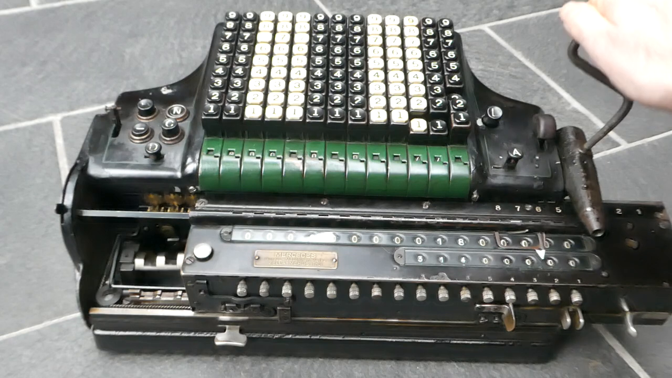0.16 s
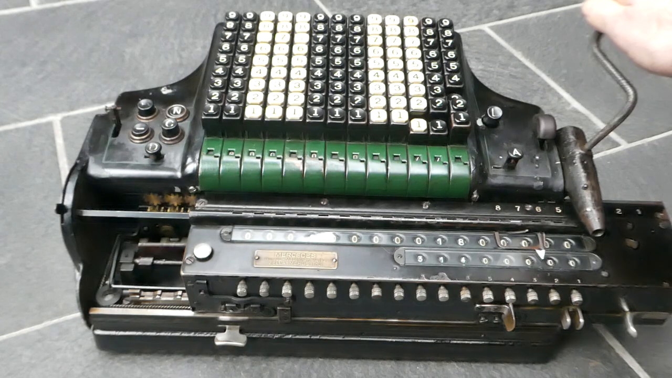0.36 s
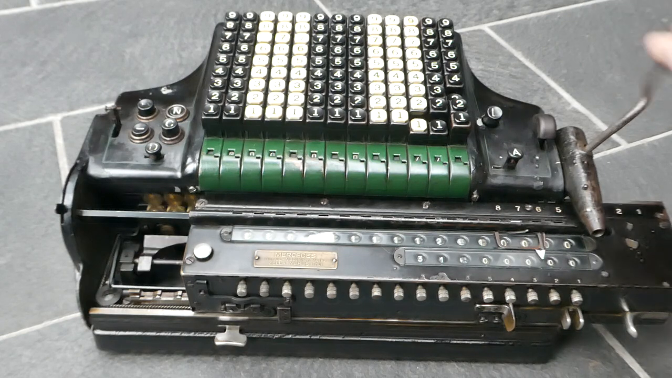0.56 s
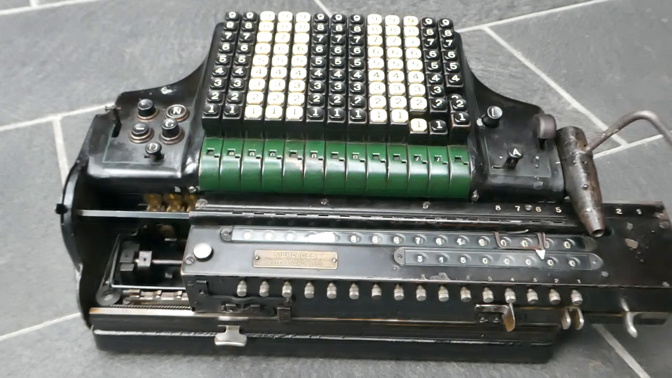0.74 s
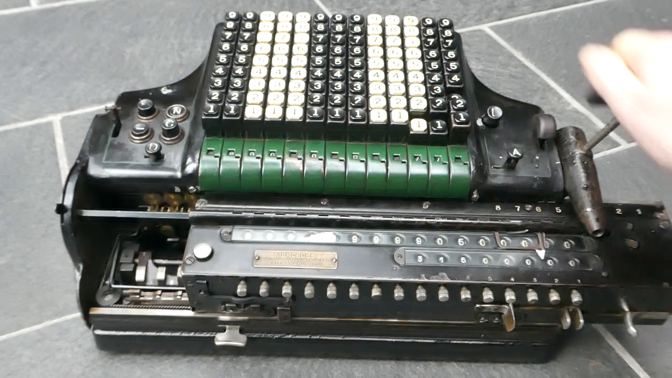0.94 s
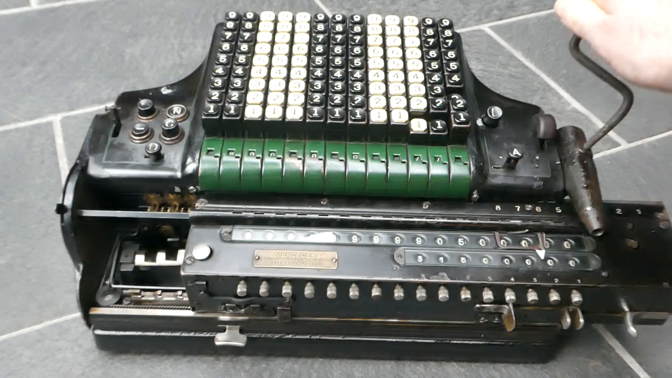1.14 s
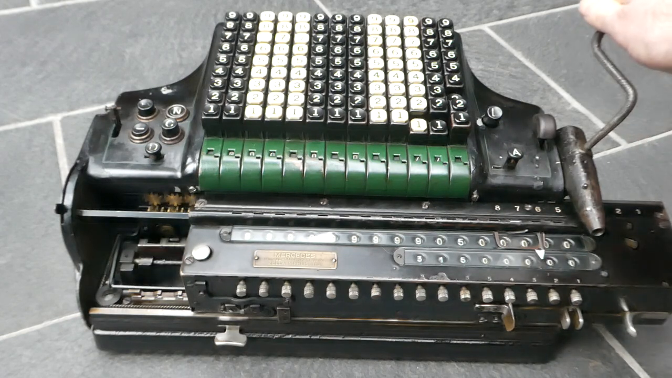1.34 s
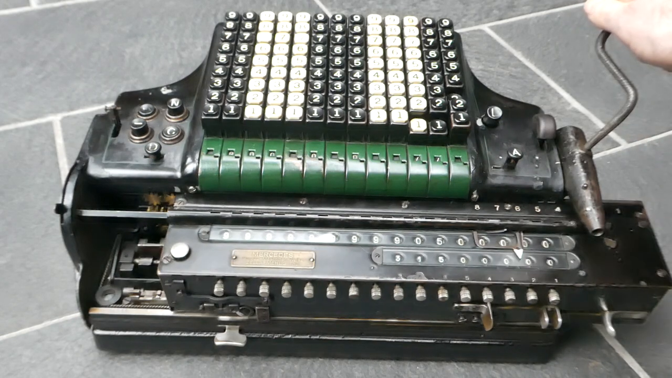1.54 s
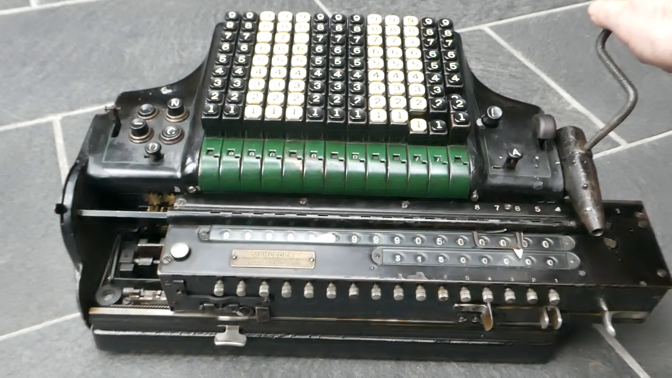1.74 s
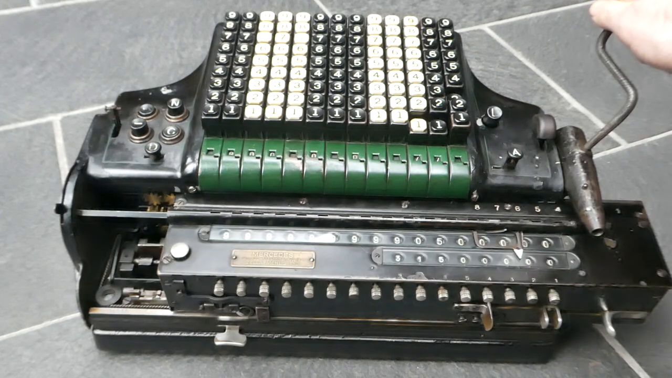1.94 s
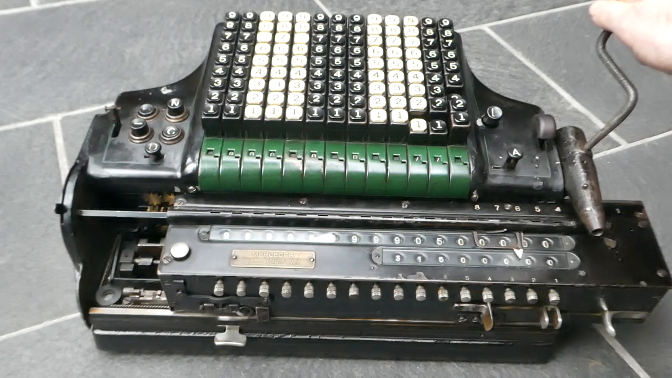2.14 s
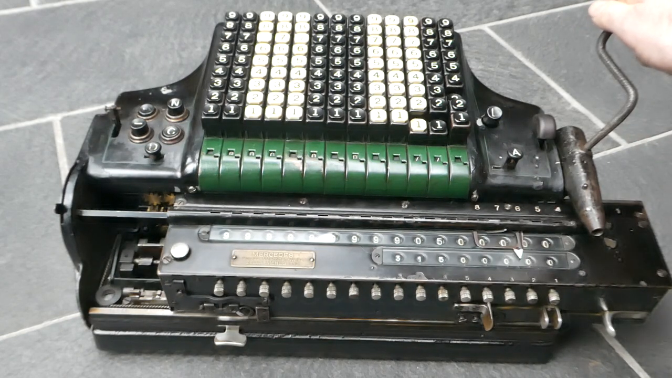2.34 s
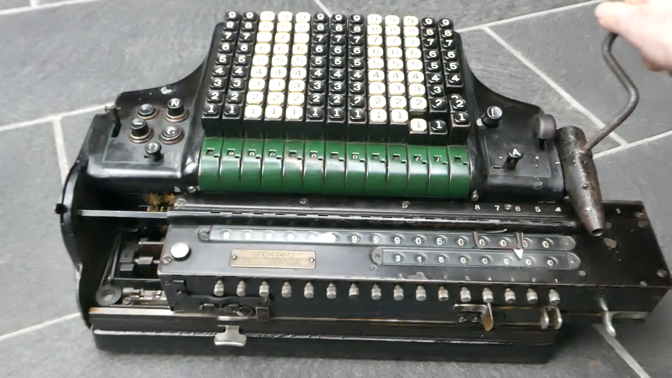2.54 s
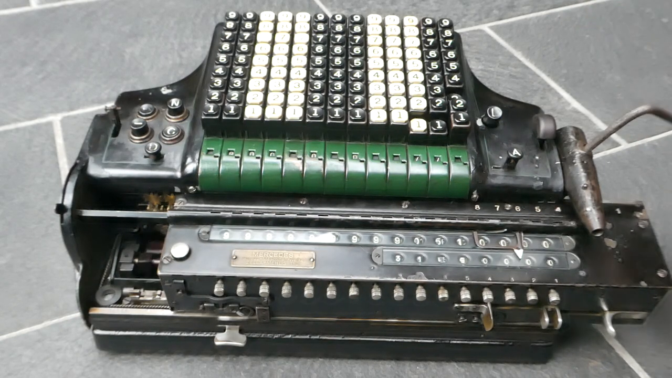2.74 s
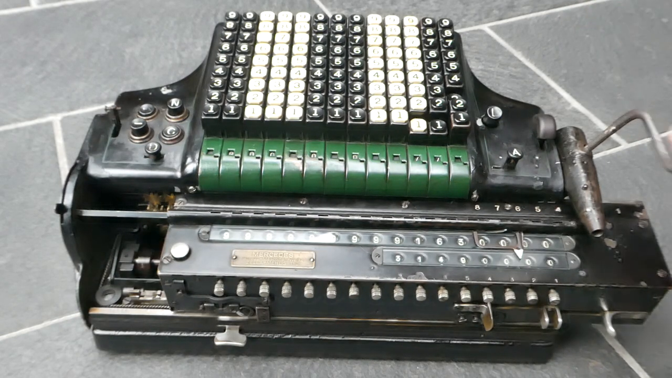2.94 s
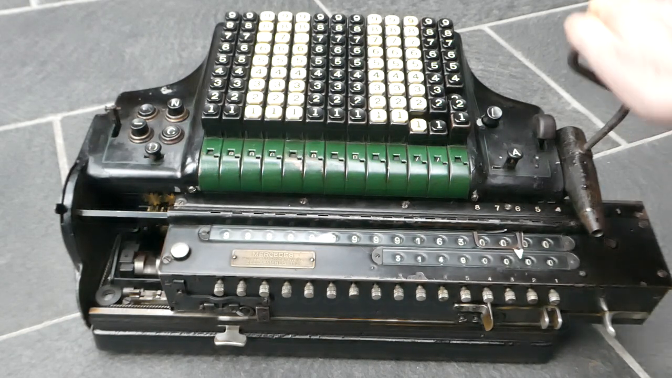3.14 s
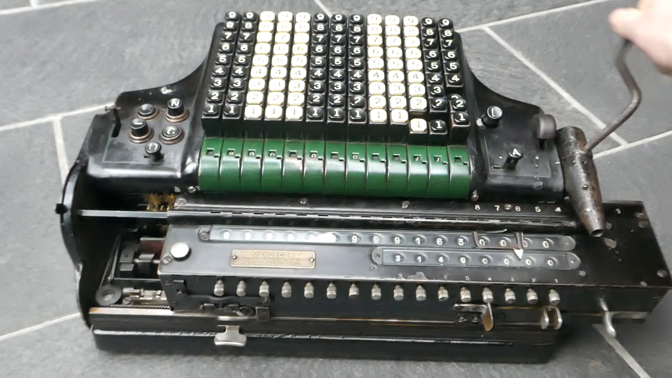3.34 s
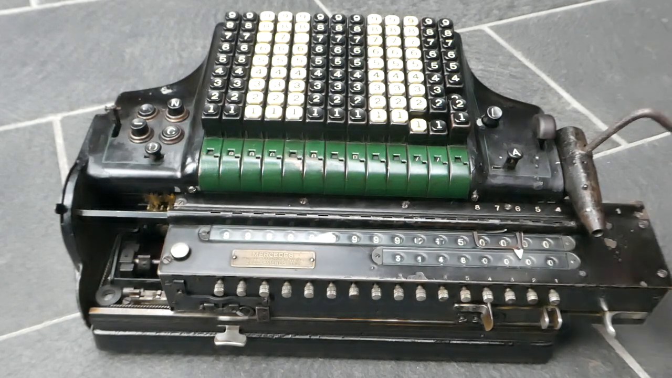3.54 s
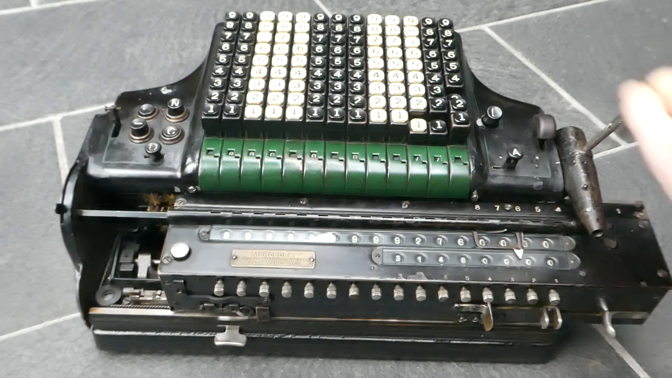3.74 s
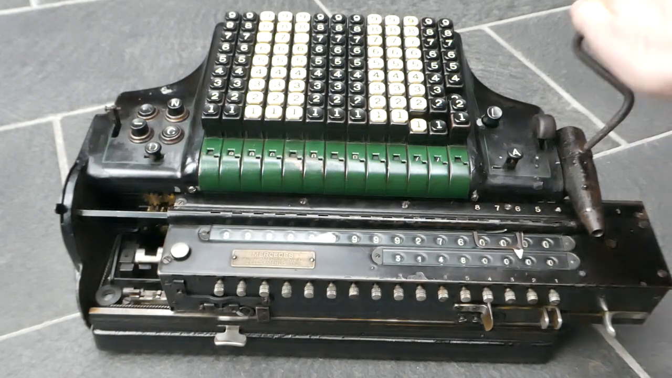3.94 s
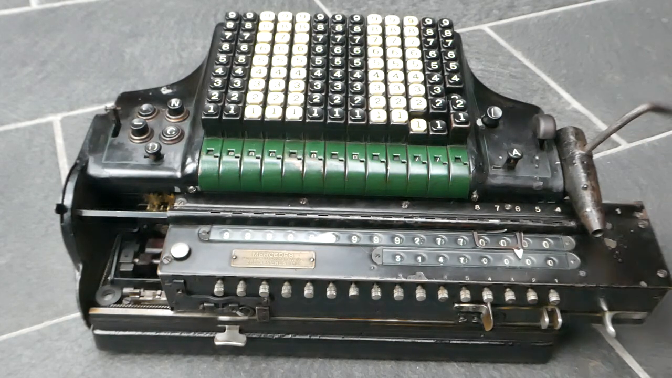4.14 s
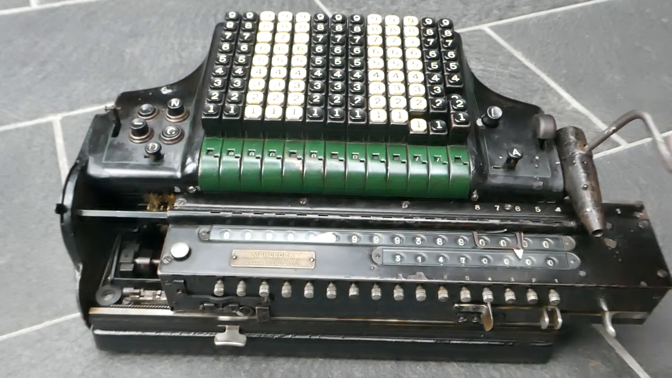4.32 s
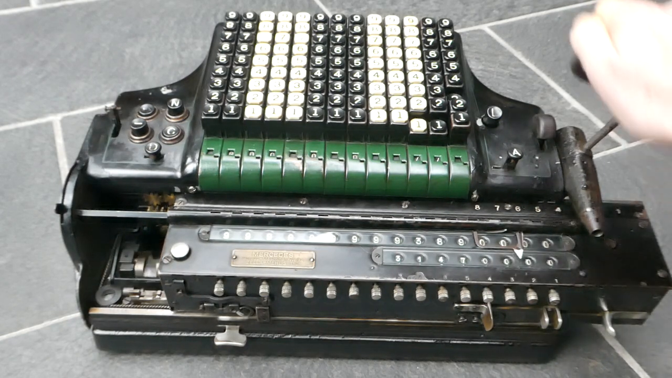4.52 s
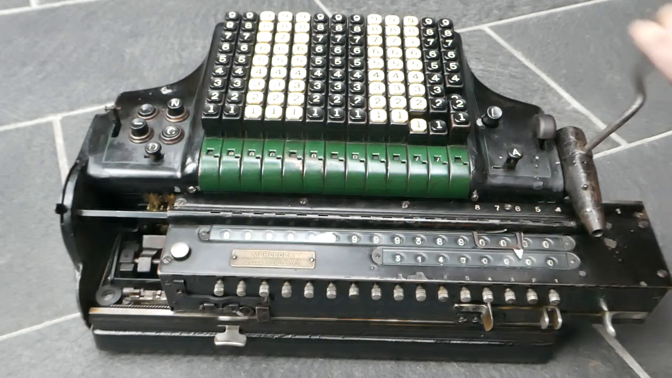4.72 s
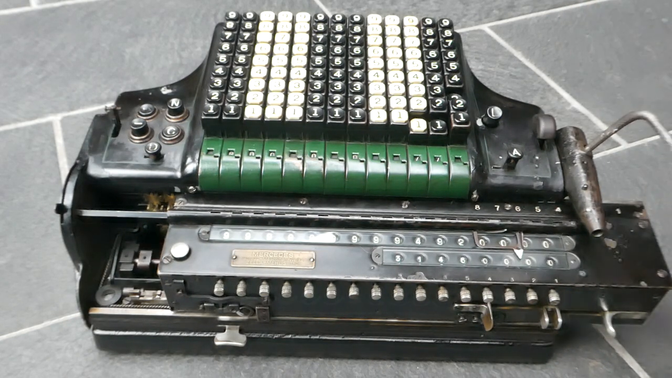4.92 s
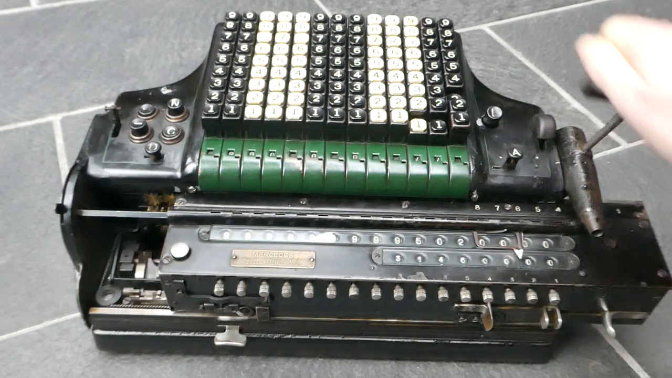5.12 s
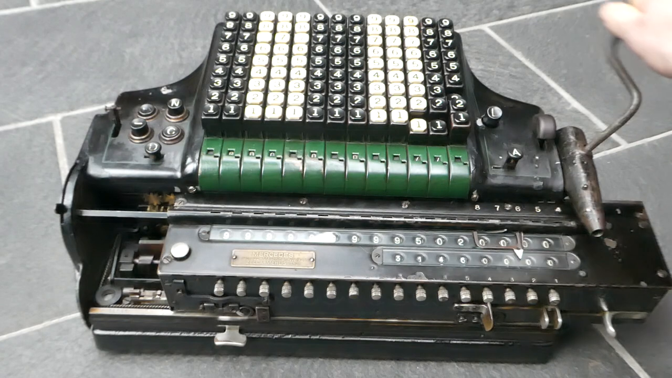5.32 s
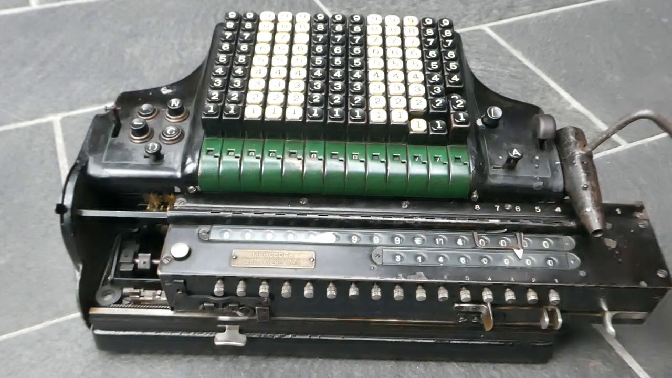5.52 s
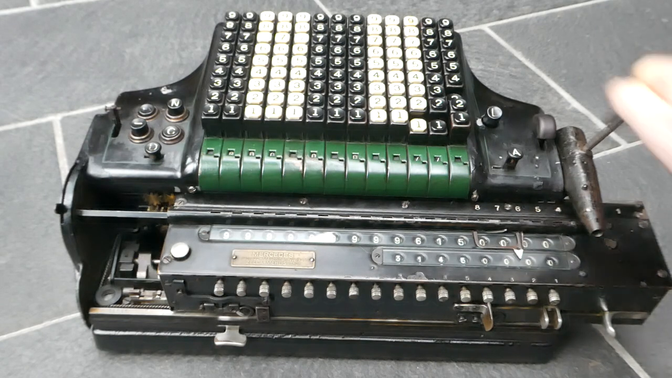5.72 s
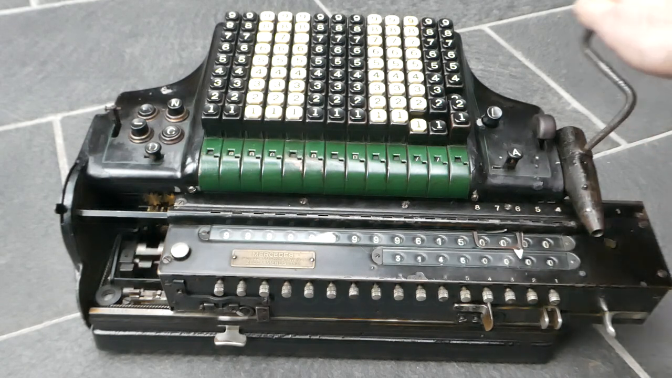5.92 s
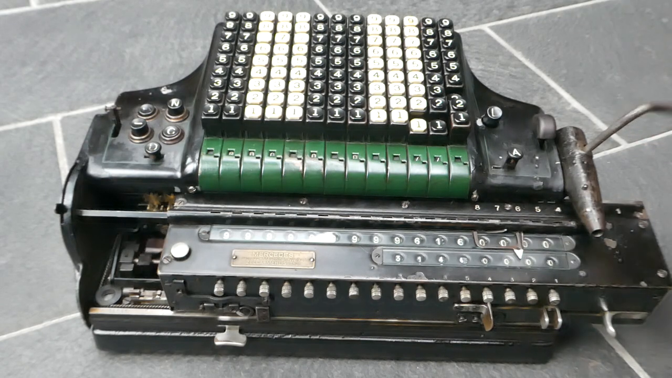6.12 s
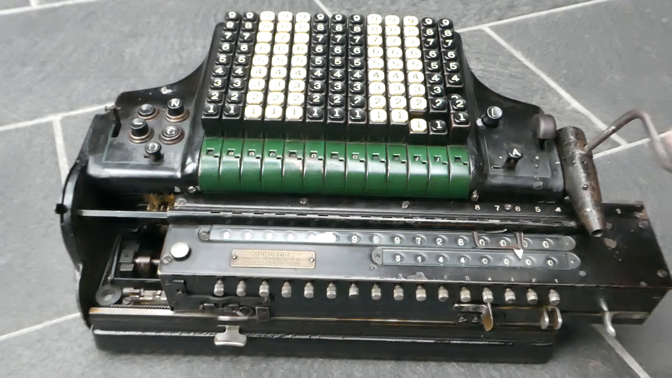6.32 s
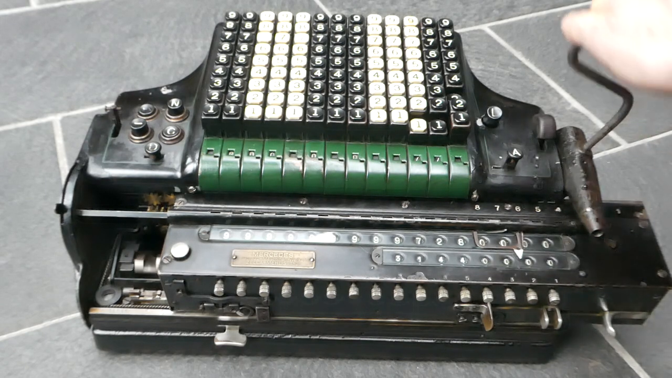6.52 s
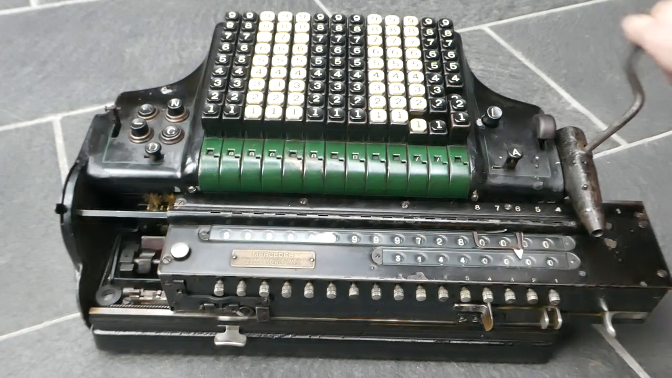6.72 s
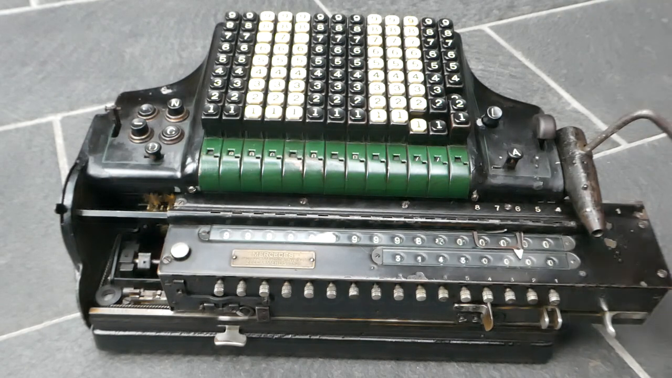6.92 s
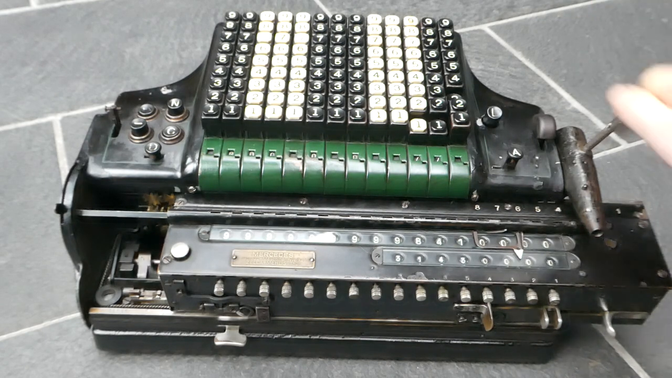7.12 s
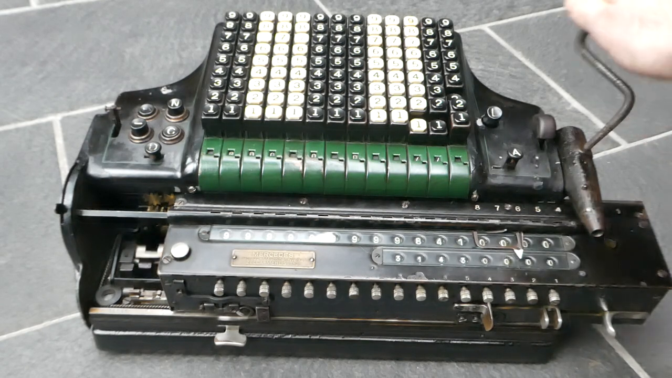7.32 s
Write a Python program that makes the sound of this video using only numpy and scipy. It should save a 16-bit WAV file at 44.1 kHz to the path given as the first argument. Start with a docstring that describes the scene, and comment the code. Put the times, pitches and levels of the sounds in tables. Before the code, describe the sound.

Close metallic ticking and knocking from a mechanical calculator, a short pause, then seven regular crank turns, each a ratchet whirr and a clank.

```python
"""A hand-cranked mechanical calculator on the tiled floor of a small hard room, miked close in stereo.
First, carries ripple through the number wheels, the carriage clanks, the wheels rasp and levers knock.
The crank rests for about a second; then the latch clinks, and from 3 s on come seven steady turns.
Each whirrs the ratchet and throws the carriage against its stop; between turns pawls click home.
The steel casing rings with the works, and the walls answer over a faint room tone."""
import sys
import numpy as np
from scipy import signal
from scipy.fft import rfft, irfft, next_fast_len
from scipy.io import wavfile
from scipy.ndimage import uniform_filter1d, map_coordinates

SR = 44100
rng = np.random.default_rng(int(sys.argv[2]) if len(sys.argv) > 2 else 0)


def waveform_to_disk(signal):
    """Save audio, clipped to [-1, 1], as 16-bit WAV at the path in sys.argv[1]."""
    frames = np.transpose(np.atleast_2d(signal))
    scaled = np.clip(frames, -1, 1) * 32767
    samples = np.round(scaled).astype(np.int16)
    wavfile.write(sys.argv[1], SR, samples)


N = 328986
FFT_SIZE = next_fast_len(N + SR)
HZ = np.fft.rfftfreq(FFT_SIZE, 1 / SR)
TIME = np.arange(N) / SR
AGE = np.arange(SR // 8) / SR  # seconds since a blow

# The carriage hits its stop. Each row: time in seconds, level in dB, extra thud in dB.
THROWS = [(0.411, -11.5, -1.5), (3.3168, -10, 0.5), (4.0469, -10, -0.5), (4.6946, -9, -1.5),
          (5.3438, -9, -1.5), (5.9994, -9.5, -2.5), (6.677, -9.5, -1), (7.4109, -10, -1)]
HARDEST_DB = max(db for _, db, _ in THROWS)
# The loose linkage clacks after a throw. Each row: time in seconds, level in dB.
LINKAGE_CLACKS = [(3.407, -35), (3.425, -32), (3.44, -31), (3.478, -18), (3.492, -23.5), (4.11, -18),
                  (4.148, -19), (4.162, -21), (4.757, -18), (4.794, -18.5), (4.809, -16.5), (5.414, -21.5),
                  (5.457, -18), (5.473, -20), (6.082, -18), (6.127, -21), (6.145, -25), (6.177, -25),
                  (6.777, -21.5), (6.828, -19), (6.84, -16.5), (6.877, -23.5)]
# One ratchet run a turn. Each row: first tooth, trip lever, last tooth in seconds, first and last dB.
RATCHET_RUNS = [(3.021, 3.137, 3.27, -36, -37.5), (3.743, 3.871, 3.98, -37.5, -36),
                (4.403, 4.53, 4.66, -38, -34.5), (5.053, 5.176, 5.325, -34.5, -36.5),
                (5.709, 5.831, 5.98, -37.5, -35.5), (6.393, 6.515, 6.73, -37, -34.5),
                (7.124, 7.247, 7.36, -37, -35)]
# Many number wheels turn at once. Each row: start and end in seconds, first and last level in dB.
WHEEL_RASPS = [(0.609, 0.805, -30, -37), (0.805, 0.895, -43.5, -41), (0.896, 1.02, -32.5, -50)]
# The colours of small steel parts and of a sharp tick. Each row: frequency in Hz, relative level in dB.
STEEL_SPECTRUM = [(35, -72), (90, -13), (300, -10), (750, -3.5), (1200, -6), (2000, -2), (3200, 2.5),
                  (4500, -1), (6500, -0.5), (7900, -4), (9500, 1), (11300, -2.5), (13500, -12),
                  (16000, -21)]
TICK_SPECTRUM = [(35, -54), (80, -15), (300, -5.5), (1200, -5.5), (2000, -3), (3200, 0.5), (7500, -3),
                 (11000, -0.5), (13000, -11.5), (16000, -22.5)]


def amp(db):
    """Decibels to gain."""
    return 10 ** (np.asarray(db) / 20)


def unit(x):
    """x at rms 1."""
    return x / np.sqrt(np.mean(x ** 2) + 1e-20)


def along(points, hz):
    """(Hz, value) points read on a log frequency axis."""
    freqs, values = np.transpose(points)
    return np.interp(np.log(hz + 1), np.log(freqs + 1), values)


def level(rows, t):
    """Gain of a (seconds, dB) curve, silent outside its span."""
    s, db = np.transpose(rows)
    return amp(np.interp(t, s, db)) * (t >= s[0]) * (t <= s[-1])


def filtered(x, response):
    """x through a frequency response."""
    return irfft(rfft(x, FFT_SIZE) * response, FFT_SIZE)[..., :N]


def coloured(x, spectrum):
    """Minimum-phase filter shaped by (Hz, dB) points; white noise keeps its level."""
    gain = unit(amp(along(spectrum, HZ)))
    cepstrum = irfft(np.log(gain + 1e-6), FFT_SIZE)
    cepstrum[1:FFT_SIZE // 2] *= 2
    cepstrum[FFT_SIZE // 2 + 1:] = 0
    return filtered(x, np.exp(rfft(cepstrum)))


def add(track, s, sound):
    """Mix a sound into the track at s seconds."""
    part = track[..., max(round(s * SR), 0):][..., :sound.shape[-1]]
    part += sound[..., :part.shape[-1]]


def burst(rise, t60):
    """A crowd of short-lived modes: mid and side noise that swells and dies."""
    shape = (1 - np.exp(-AGE / rise)) * amp(-60 * AGE / t60)
    return shape / shape.max() * rng.standard_normal((2, len(AGE)))


def chatter(spread, t60, count):
    """A light part touches several times within milliseconds; a nearby plate adds one quick echo."""
    out = np.zeros((2, len(AGE)))
    for touch in (np.arange(count) + rng.uniform(0, 1, count)) / count:
        add(out, touch * spread, rng.uniform(0.73, 1) * burst(rise=0.000092, t60=t60))
    add(out, rng.uniform(.0001, .0006), rng.choice([-.4, .4]) * out)
    return out / np.sqrt(count)


def ring(modes, detune, rise):
    """A few clear decaying modes, tuned a little differently at every blow."""
    tone = sum(amp(db - 60 * AGE / t60) * np.sin(2 * np.pi * hz * rng.normal(1, detune) * AGE)
               for hz, db, t60 in modes)
    return tone * (1 - np.exp(-(AGE / rise) ** 2))


def heavy_contacts():
    """The blows of carriage, linkage and levers, as (seconds, level dB, thud dB, treble dB)."""
    # A graze, the blow, two rebounds. Each row: delay in seconds; level, thud, treble in dB re the throw.
    impact = [(-.012, -17, -33.5, -48), (0, 0, -13.5, -29), (.025, -5.5, -20, -31.5),
              (.034, -13.5, -18, -34.5)]
    # Levers shift and fall home. Each row: time in seconds; level, thud and treble in dB.
    levers = [(1.1003, -23, -41, -29.5), (1.273, -25, -25.5, -38), (1.372, -13.5, -30.5, -43),
              (1.383, -21, -28.5, -39.5), (1.422, -48, -32, -54), (1.5507, -23, -18.5, -24.5),
              (1.588, -33, -25.5, -46), (1.612, -42, -36, -57), (1.651, -44, -32.5, -52),
              (1.675, -37, -45, -55), (2.58, -32, -40, -53.5), (2.591, -39, -49, -66),
              (2.6697, -20.5, -39, -50), (2.678, -23.5, -39, -58), (2.7084, -26, -32.5, -39.5),
              (2.715, -24, -37, -50), (2.8755, -20, -36.5, -45), (6.714, -31, -30.5, -45),
              (6.744, -36, -28.5, -54), (6.864, -21.5, -44, -34)]
    carriage = [(s + delay, db + hit_db, db + weight_db + thud_db, db + treble_db)
                for s, db, weight_db in THROWS for delay, hit_db, thud_db, treble_db in impact]
    linkage = [(s, db, db - 16.5, db - 30) for s, db in LINKAGE_CLACKS]
    return carriage + linkage + levers


def knocks():
    """Contacts crack and the base thuds; hard blows clank heavy parts, soft ones rattle the linkage."""
    # The colours of a blow. Each row: frequency in Hz, relative level in dB.
    snap_spectrum = [(60, -60), (300, -29), (2500, -6), (4700, 14), (7500, 11), (9800, 15), (12500, 5),
                     (16000, 0)]  # the bright first edge
    clank_spectrum = [(500, -30), (1150, -9), (1650, 0), (2200, -5), (3100, 0), (4000, -6.5), (5400, -9),
                      (7500, -20), (14000, -59)]  # heavy parts
    clack_spectrum = [(60, -49), (500, -13), (1100, -12), (1550, 2), (2000, -0.5), (2700, -3), (4200, -9),
                      (7000, -14), (14000, -84)]  # loose linkage
    thud_spectrum = [(30, -85), (70, -11.5), (125, -7), (220, -6.5), (320, 1), (600, 1.5), (850, 1),
                     (1100, -5.5), (2000, -22.5), (6000, -54)]  # the base
    snap, crack, clank, clack, thud = np.zeros((5, 2, N))
    for s, db, thud_db, treble_db in heavy_contacts():
        hardness = amp(db - HARDEST_DB)
        add(snap, s, amp(treble_db + 13 * hardness) * burst(rise=.0001, t60=0.005))
        add(crack, s, amp(treble_db + 5.5) * burst(rise=0.00018, t60=0.06))
        add(clank, s + 0.001193, hardness * amp(db - 13) * burst(rise=.0015, t60=.05))
        add(clack, s, (1 - hardness) * amp(db - 5.5) * chatter(spread=0.007, t60=0.038, count=4))
        add(thud, s + 0.0012, amp(thud_db - 5.5) * burst(rise=0.0024, t60=0.069))
    thud[1] *= amp(-9.5)  # less side: the base moves as one, near the middle
    return (coloured(snap, snap_spectrum) + coloured(crack, TICK_SPECTRUM)
            + coloured(clank, clank_spectrum) + coloured(clack, clack_spectrum)
            + coloured(thud, thud_spectrum))


def carriage_stop():
    """The stop pings under hard blows and barely under soft ones, swelling for about a millisecond."""
    # Each row: a mode's frequency in Hz, level in dB, seconds to fall 60 dB.
    stop_modes = [(3165, 8.5, 0.0065), (2930, 3.5, 0.0076), (3360, -12.5, 0.014), (1750, -9.5, 0.017)]
    track = np.zeros((2, N))
    for s, db, *_ in heavy_contacts():
        hardness = amp(db - HARDEST_DB)
        ping = ring(stop_modes, detune=.006, rise=.001)
        add(track[0], s + 0.0005, hardness ** 1.4 * amp(db + 3.6) * ping)
    return track


def tooth_times(start, trip, last):
    """A turn drags towards the trip lever, then runs free: one pattern, stretched by the hand's speed."""
    # Each row: tooth number, relative gap to the next tooth.
    tooth_gaps = [(0, 1), (2, .78), (3, 1.03), (5, 1), (6, 1.25), (8, 1.35), (9, .92), (10, 1.38),
                  (11, 1.03), (20, .88)]
    tooth_count, trip_tooth = 22, 9
    gaps = np.interp(np.arange(tooth_count - 1), *np.transpose(tooth_gaps))
    progress = np.append(0, np.cumsum(gaps))
    return np.interp(progress, progress[[0, trip_tooth, -1]], [start, trip, last])


def ratchet():
    """The pawl rides over the teeth, each with its own strength; the wheels' teeth crowd into a rasp."""
    rasp_teeth_per_s = 170
    track, teeth = np.zeros((2, N)), []
    for start, trip, last, first_db, last_db in RATCHET_RUNS:
        times = tooth_times(start, trip, last)
        levels_db = np.linspace(first_db, last_db, len(times))
        levels_db[0] -= 1  # the pawl only half catches the first tooth
        teeth += zip(times, levels_db)
    for start, end, first_db, last_db in WHEEL_RASPS:
        count = round((end - start) * rasp_teeth_per_s)
        teeth += zip(np.linspace(start, end, count), np.linspace(first_db, last_db, count))
    for s, db in teeth:
        strength = amp(db + 7.5 + rng.normal(0, 1.3))
        add(track, s, strength * chatter(spread=.005, t60=.024, count=7))
    return coloured(track, STEEL_SPECTRUM)


def light_contacts():
    """The ticks of carries, grazed teeth, the trip lever, pawls and latches, as (seconds, dB)."""
    # A carry ripples from wheel to wheel. Each row: start and end in seconds, first and last level in dB.
    carries = [(0.012, 0.088, -23, -17), (0.167, 0.352, -31.5, -30), (0.609, 0.796, -16.5, -16.5)]
    # Pawls drop and latches snap in. Each row: time in seconds, level in dB.
    drops = [(0.564, -30.5), (0.598, -26), (0.618, -15.5), (0.8314, -16), (1.0152, -22), (1.036, -23),
             (1.055, -25), (1.0978, -13.5), (1.2504, -35), (1.3086, -33.5), (1.44, -32), (1.543, -22),
             (1.563, -15.5), (2.7425, -19.5), (2.8031, -26), (2.8428, -25), (2.856, -32), (2.878, -25.5),
             (2.906, -19), (2.9432, -21.5), (3.034, -26), (3.476, -21.5), (3.513, -25), (3.52, -24),
             (3.545, -24.5), (3.585, -24), (3.595, -28), (3.617, -23.5), (3.64, -20), (3.672, -23),
             (4.147, -25), (4.153, -28), (4.187, -25), (4.194, -24), (4.215, -21), (4.246, -27),
             (4.256, -25), (4.272, -24), (4.299, -23), (4.328, -21.5), (4.794, -23.5), (4.81, -27),
             (4.832, -25), (4.842, -23), (4.863, -25), (4.894, -24.5), (4.905, -31), (4.927, -24),
             (4.947, -24), (4.972, -24), (5.065, -22.5), (5.082, -21), (5.459, -24), (5.497, -23),
             (5.506, -25.5), (5.524, -23), (5.55, -25), (5.557, -27.5), (5.58, -27), (5.591, -24.5),
             (5.635, -22.5), (6.13, -23), (6.171, -22.5), (6.195, -23), (6.224, -21.5), (6.26, -24.5),
             (6.281, -25), (6.319, -22), (6.408, -29), (6.825, -24.5), (6.831, -24), (6.879, -22.5),
             (6.919, -24.5), (6.97, -25.5), (6.993, -25.5), (7.022, -25), (7.135, -18)]
    carry_step_s, ticks = .026, []
    for first, last, first_db, last_db in carries:
        wheels = round((last - first) / carry_step_s) + 1
        ticks += zip(np.linspace(first, last, wheels), np.linspace(first_db, last_db, wheels))
    for start, trip, _, first_db, last_db in RATCHET_RUNS:
        ticks.append((start - 0.013, -28))  # a tooth grazes ahead of the run
        ticks.append((trip, (first_db + last_db) / 2 + 13))  # the trip lever clicks above the teeth
    return ticks + drops


def pawls():
    """Pawls and other light parts tick home; early in each run the pawl bites on two teeth and rings."""
    # Each row: a mode's frequency in Hz, level in dB, seconds to fall 60 dB.
    pawl_modes = [(1940, -2, 0.027), (2900, 1.5, 0.026), (3200, -12, 0.0087), (4080, 0, 0.042)]
    ticks = np.zeros((2, N))
    for s, db in light_contacts():
        add(ticks, s - .0005, amp(db - 5) * chatter(spread=.0038, t60=.021, count=5))
    track = coloured(ticks, TICK_SPECTRUM)
    for start, trip, last, *_ in RATCHET_RUNS:
        for s in tooth_times(start, trip, last)[1:3]:
            add(track[0], s, amp(-32.5) * ring(pawl_modes, detune=0.036, rise=0.0013))
    return track


def latch():
    """The steel latch clinks when it is struck, and more faintly whenever the linkage shakes it."""
    # Each row: time of a blow in seconds, level in dB.
    blows = [(2.671, -36), (2.683, -33), (2.709, -25.5), (2.717, -29.5), (2.875, -32.5)]
    # Each row: a mode's frequency in Hz, level in dB, seconds to fall 60 dB.
    latch_modes = [(1380, -4, .025), (1588, -2, .065), (1911, 0, .028), (2164, -5, .04), (2740, -10, .05)]
    shakes = [(s, db - 18.5) for s, db in LINKAGE_CLACKS]
    track = np.zeros((2, N))
    for s, db in blows + shakes:
        add(track[0], s, amp(db) * ring(latch_modes, detune=.022, rise=.0015))
    return track


def sliding_steel():
    """A fine gritty hiss that swells while the gears mesh and fades as they coast."""
    # Shafts and slides rub before the steady turns. Each row: time in seconds, level in dB.
    rubbing = [(0, -29.5), (.1, -40), (.16, -42), (.38, -69), (.58, -48), (1.07, -42), (1.2, -47.5),
               (1.35, -66), (1.56, -42.5), (1.9, -68.5), (2.56, -62.5), (2.68, -54), (2.8, -49.5),
               (3.01, -53)]
    # The slides coast to rest after a run. Each row: seconds after the last tooth, level in dB.
    coasting = [(0.01, -53), (0.2, -47.5), (0.42, -57)]
    roughness_db = 2 * unit(uniform_filter1d(rng.standard_normal(N), size=90))
    grit = unit(amp(roughness_db) * rng.standard_normal((2, N)))
    mesh = sum(level([(start, first_db), (end, last_db)], TIME)
               for start, *_, end, first_db, last_db in RATCHET_RUNS + WHEEL_RASPS)
    coast = sum(level(coasting, TIME - last) for _, _, last, *_ in RATCHET_RUNS)
    slide = level(rubbing, TIME) + coast
    return coloured(grit * (amp(-6.5) * mesh + amp(-1) * slide), STEEL_SPECTRUM)


def feet():
    """The machine rocks, and its feet give soft low pushes on the tiles."""
    # Each row: time of a push in seconds, level in dB.
    pushes = [(1.275, -44), (1.552, -39), (2.553, -59), (4.392, -48)]
    track = np.zeros((2, N))
    for s, db in pushes:
        add(track, s, amp(db) * burst(rise=0.007, t60=0.042))
    return coloured(track, [(25, -33), (70, -2.5), (130, 6.5), (190, -3.5), (400, -14.5), (1500, -56)])


def casing(works):
    """The steel shell rings in the middle; each resonance wanders in strength, as blows land anywhere."""
    # Each row: a resonance's frequency in Hz, width in Hz, level in dB.
    resonances = [(195, 22, -1), (265, 26, -6), (322, 26, 0), (395, 16, -2), (457, 16, -5), (578, 20, 1),
                  (616, 24, -7), (776, 28, -7), (895, 14, -1), (1561, 20, -3), (1351, 48, -7),
                  (1908, 45, -6), (2497, 30, -7), (2938, 60, -9)]
    scatter_db, changes_per_s = 3, 9
    mid, side = works
    shell = np.zeros(len(HZ), complex)
    for hz, width, db in resonances:
        places = rng.standard_normal(N * changes_per_s // SR + 4)
        wander = map_coordinates(places, [TIME * changes_per_s], order=1)
        resonator = 1j * HZ * width / (hz * hz - HZ * HZ + 1j * HZ * width)
        shell += rfft(mid * amp(db + scatter_db * wander), FFT_SIZE) * resonator
    return np.array([mid + irfft(shell, FFT_SIZE)[:N], side])


def reflections(direct):
    """The hard walls give a diffuse, ever changing answer in which each frequency dies at its own speed."""
    # Each row: frequency in Hz, strength of the walls' answer in dB.
    wall_gains = [(100, -5.5), (600, -3.5), (2000, -8.5), (5000, -7.5), (12000, -8.5)]
    # Each row: frequency in Hz, seconds for the room to fall 60 dB.
    decay_times = [(100, 0.45), (500, 0.7), (1500, 0.68), (5000, 0.5), (10000, 0.2), (16000, 0.2)]
    sent = filtered(direct, amp(along(wall_gains, HZ)))
    out, block, delay_s = np.zeros((2, N)), SR // 3, .008
    for start in range(0, N, block):
        hz, t, noise = signal.stft(rng.standard_normal((2, SR * 3 // 4)), SR, nperseg=256)
        decay = amp(-60 * t / along(decay_times, hz)[:, None])
        _, tail = signal.istft(noise * decay, SR, nperseg=256)
        tail /= np.linalg.norm(tail[0])
        add(out, start / SR + delay_s, signal.fftconvolve(sent[:, start:start + block], tail, axes=1))
    return out


def room_tone():
    """The faint steady rush of the room."""
    # Each row: frequency in Hz, relative level in dB.
    air_spectrum = [(15, -56), (25, -15), (317, 1), (476, -7.5), (607, -3), (734, -16), (863, -6.5),
                    (1190, -7.5), (6920, -20.5), (14400, -44), (16000, -83)]
    return amp(-60.5) * coloured(rng.standard_normal((2, N)), air_spectrum)


def scene():
    """The machine close by, with the walls behind it; the stop faces the microphone and stays drier."""
    # Stereo width. Each row: frequency in Hz, gain of the side signal in dB.
    side_gains = [(30, 0), (70, -1), (130, -1), (250, -0.5), (1000, -4.5), (3000, -10.5), (8000, -10),
                  (13000, -6)]
    machine = casing(knocks() + latch() + pawls() + ratchet() + sliding_steel() + feet())
    ping = carriage_stop()
    walls = reflections(machine + amp(-7.5) * ping)
    mid, side = machine + ping + walls + room_tone()
    side = filtered(side, amp(along(side_gains, HZ)))
    return np.array([mid + side, mid - side])


def record(dry):
    """Two closely spaced microphone ports differ a little in phase and colour; the top is cut steeply."""
    # Each row: frequency in Hz, left minus right in dB.
    balance = [(60, 4.5), (150, 1), (380, 0.5), (950, 0.5), (2380, -1.5), (5980, 0.0), (15000, 2.0)]
    # Each row: frequency in Hz, radians by which the left leads.
    phase_lead = [(60, 0.3), (500, -0.2), (1000, -0.54), (3000, 0.3), (10000, 0.23)]
    top_hz = 15900
    left_port = amp(along(balance, HZ) / 2) * np.exp(1j * along(phase_lead, HZ) / 2)
    low_pass = 1 / np.sqrt(1 + (HZ / top_hz) ** 160)
    return filtered(dry, np.array([left_port, 1 / left_port]) * low_pass)


dry = scene()
out = record(dry)
waveform_to_disk(out)
```